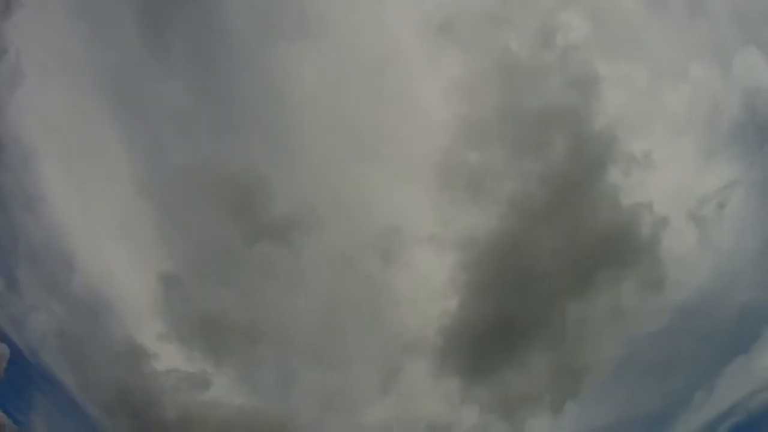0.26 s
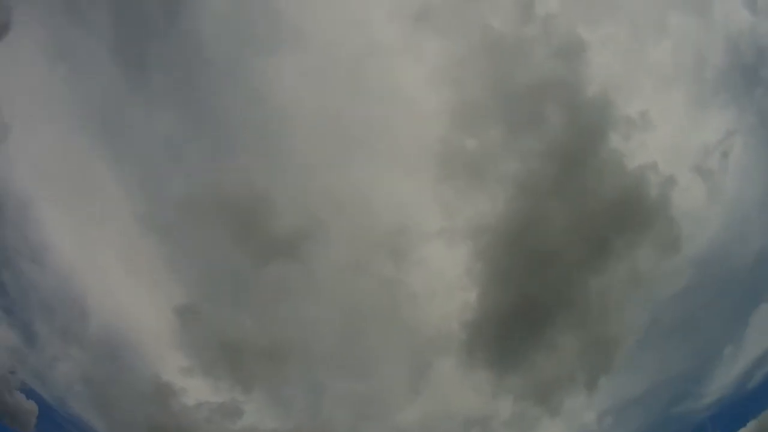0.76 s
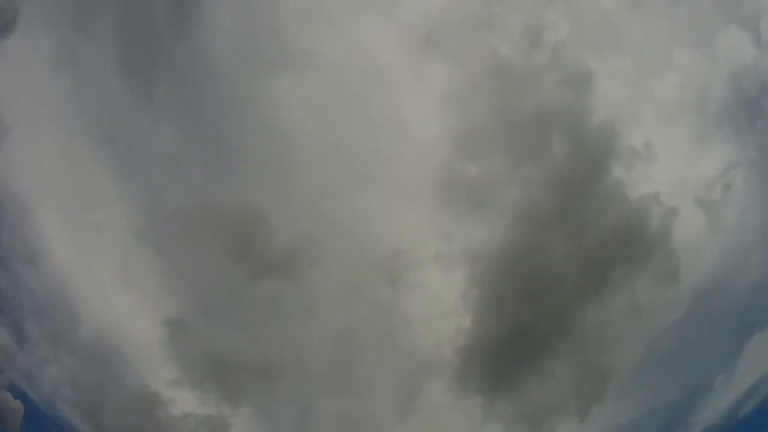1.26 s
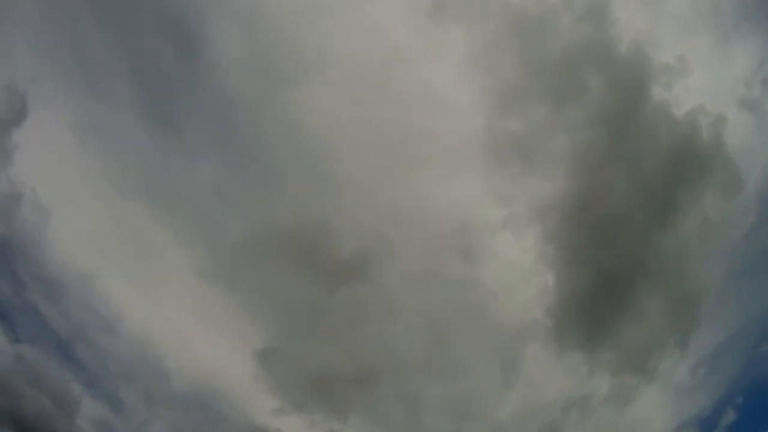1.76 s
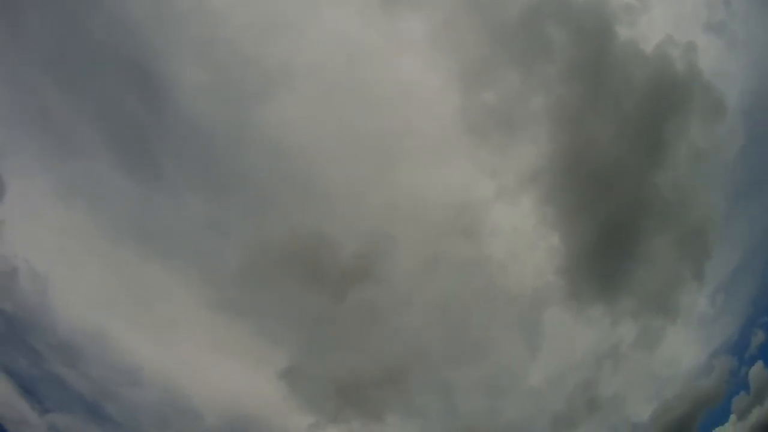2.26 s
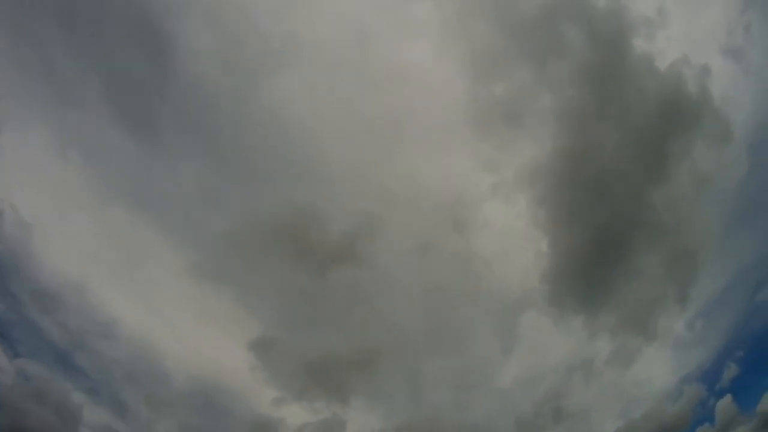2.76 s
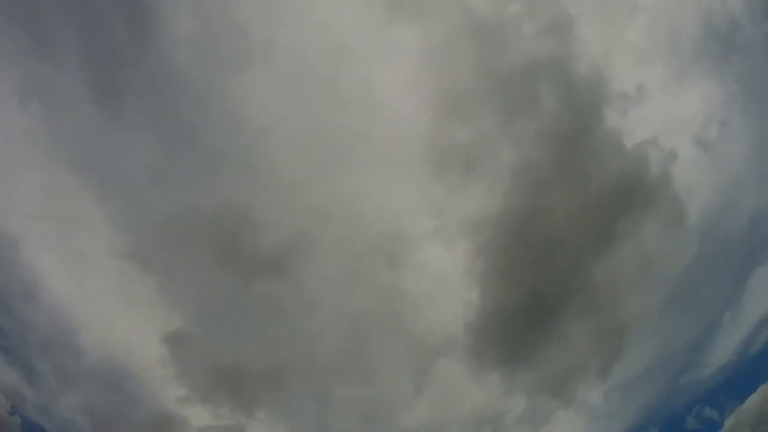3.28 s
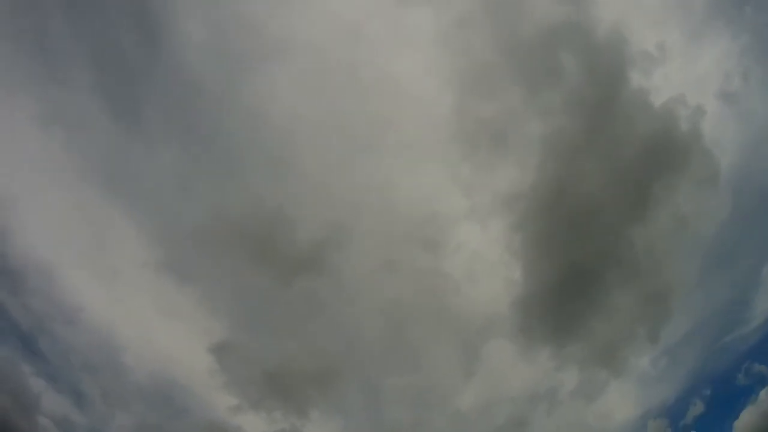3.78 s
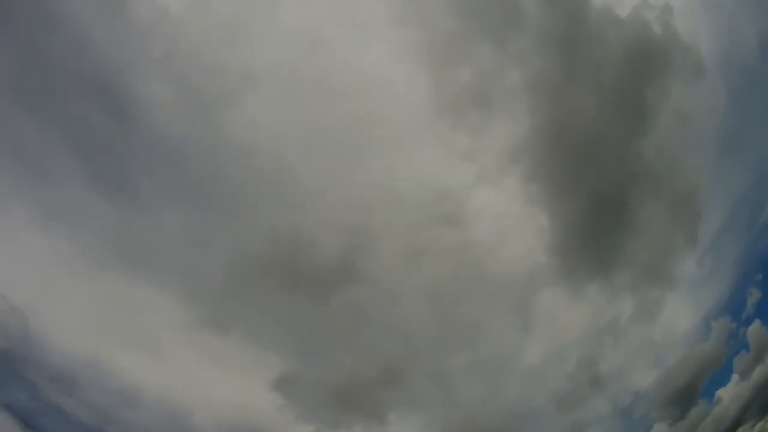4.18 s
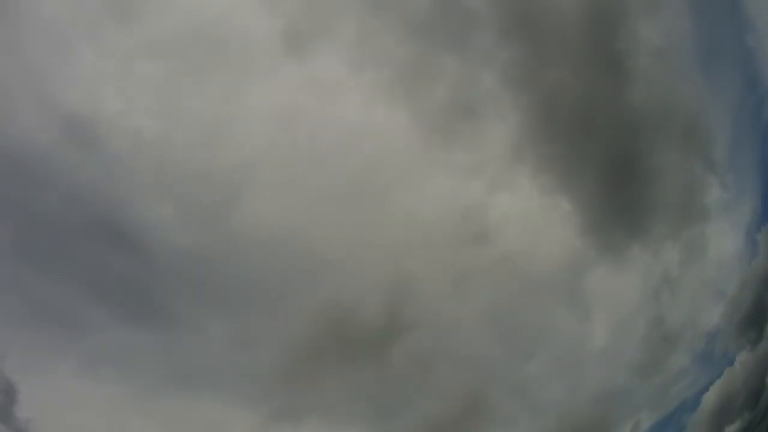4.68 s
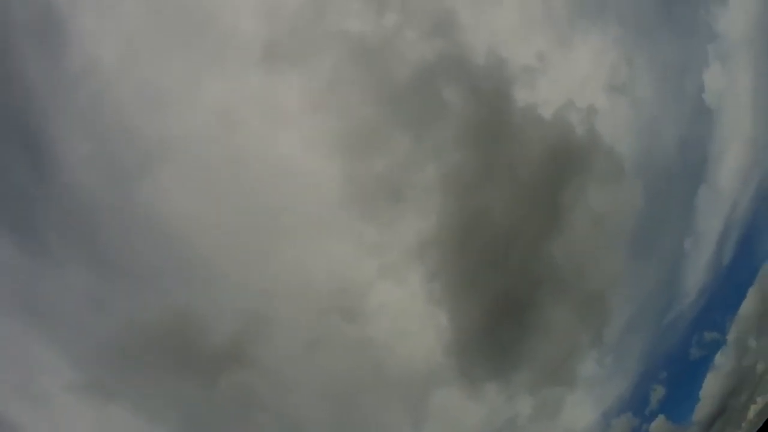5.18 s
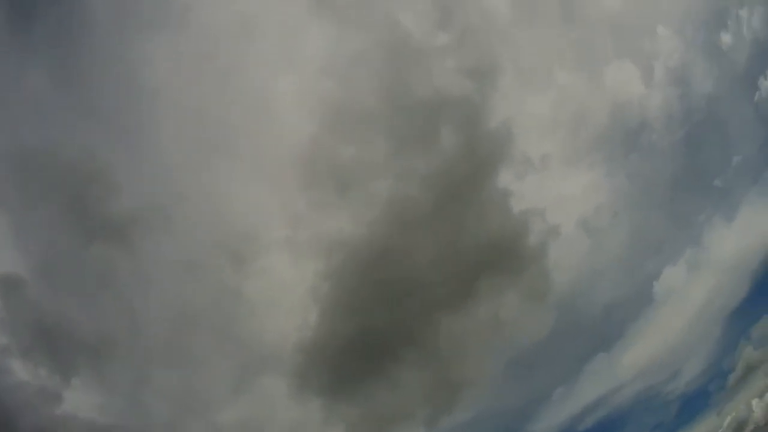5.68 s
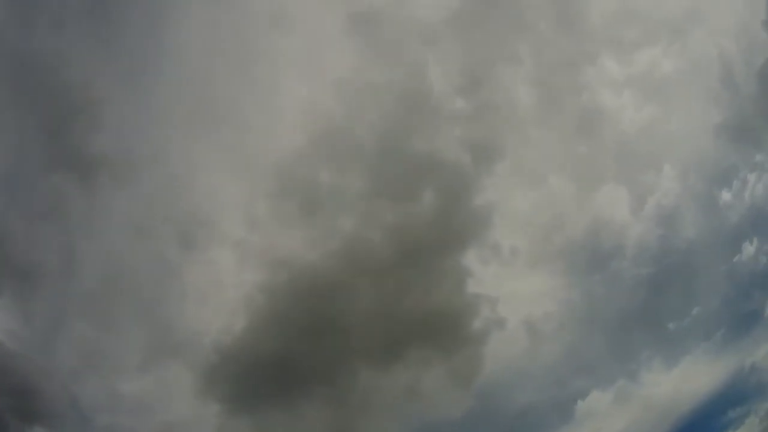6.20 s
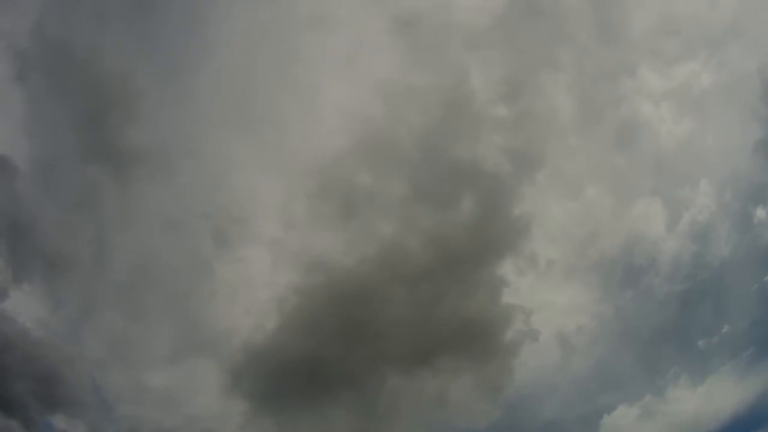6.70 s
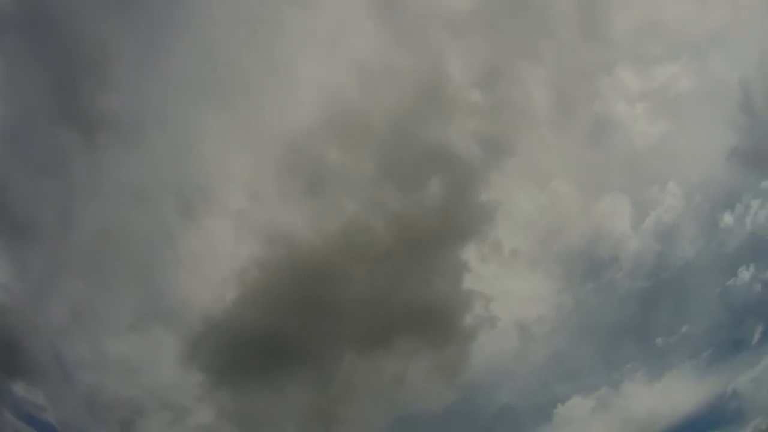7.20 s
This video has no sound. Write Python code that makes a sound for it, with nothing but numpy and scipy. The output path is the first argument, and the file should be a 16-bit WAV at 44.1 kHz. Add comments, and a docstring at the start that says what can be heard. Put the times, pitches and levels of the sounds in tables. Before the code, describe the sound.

Small electric drone whines at full throttle, pitch slowly sagging, then power cuts; gusty air rushes past amid knocks as the propellers stop, leaving faint ticking.

```python
"""A small electric aircraft in a full-throttle climb, heard by a microphone bolted to its frame.
Shaft orders whine through the frame's resonances over shaped-noise propeller wash while the battery sags
and the pitch sinks; faint rings tick steadily at the rate of the control signal. At 6.04 s the power is cut,
air rushes past as gusty noise, and the shaft runs down with knocks and a thin falling squeal.
It stops; the rush dies away over the ticks."""
import sys
import numpy as np
from scipy import signal
from scipy.fft import rfft, irfft, next_fast_len
from scipy.io import wavfile
from scipy.ndimage import uniform_filter1d

SR = 44100
rng = np.random.default_rng(int(sys.argv[2]) if len(sys.argv) > 2 else 0)


def voltage_ratio(decibels):
    """Convert decibels (scalar or array-like) to amplitude ratios, 20 dB per decade."""
    exponent = np.asarray(decibels, float) / 20
    return 10 ** exponent


def unload_wav(signal):
    """Save mono or channel-first audio to the path in sys.argv[1] as 16-bit WAV at rate SR, clipped to [-1, 1]."""
    wavfile.write(
        sys.argv[1],
        SR,
        np.round(np.clip(np.atleast_2d(signal).T, -1, 1) * 32767).astype(np.int16),
    )


N = 328545
TIME = np.arange(N) / SR
CUT_S = 6.042  # the power goes off

# The climb on a sagging battery: start_s [s], shaft_speed_hz [Hz], blade_turbulence_db [dB]
CLIMB = [(0, 368.6, -30.5), (.3, 366.6, -31.5), (.55, 365.2, -31), (.75, 363, -30), (.95, 359.8, -29.5),
         (1.2, 359, -30.5), (1.45, 359.2, -32), (1.8, 357.8, -34), (2.25, 357.8, -32.5), (2.7, 355.3, -34),
         (3.15, 353.5, -33), (3.6, 351.9, -34), (4.05, 349.6, -33.5), (4.5, 348, -35), (4.95, 346.6, -34),
         (5.4, 346.1, -37), (5.75, 345, -36.5), (6.03, 344.3, -34.5)]


def curves(rows):
    """Columns of a table joined by straight lines in time."""
    start_s, *columns = np.transpose(rows)
    return [np.interp(TIME, start_s, column) for column in columns]


def walk(rate_hz):
    """Random levels held for 1 / rate_hz seconds and slewed twice; spread near 1."""
    hold = int(SR / rate_hz)
    steps = np.repeat(rng.standard_normal(N // hold + 1), hold)
    return 1.3 * uniform_filter1d(uniform_filter1d(steps, hold), hold)[:N]


def bands(colour):
    """Overlapping slices of coloured noise, half an octave apart: pairs of centre in Hz and sound."""
    size = next_fast_len(N)
    octave = np.log2(np.arange(1, size // 2 + 2) * SR / size)
    hz, level_db = np.transpose(colour)
    tint = voltage_ratio(np.interp(octave, np.log2(hz), level_db, left=-95))
    spectrum = rfft(rng.standard_normal(size)) * tint
    for centre in np.arange(5, 14.6, .5):
        window = np.clip(1 - abs(octave - centre) / .5, 0, 1)
        yield 2 ** centre, irfft(spectrum * window, size)[:N]


def unit(x, part):
    """Scale a sound so that a part of it has rms 1."""
    return x / np.sqrt(np.mean(part ** 2))


def shaft():
    """Speed in Hz, sinking toward windmilling after the cut, and the share of load on the motor."""
    windmill_hz, sink_s, ease_s, unload_s = 147, .112, .025, .028
    after = np.maximum(TIME - CUT_S, 0)
    hz = windmill_hz + (curves(CLIMB)[0] - windmill_hz) * np.exp(-after / sink_s)
    return uniform_filter1d(hz, int(ease_s * SR)), np.clip(1 - after / unload_s, 0, 1)


def slowed(hz):
    """Octaves by which the shaft is below the climb's speed curve."""
    return np.log2(curves(CLIMB)[0] / hz)


def whine(turn, hz, load):
    """Shaft orders, phase-locked to the turn; the frame's peaks colour them, turbulence shakes them."""
    # Multiples of the shaft speed [count]
    orders = (1, 2, 3, 4, 5, 6, 7, 8, 9, 10, 11, 12, 14, 16, 18, 20, 22, 24, 28, 30)
    # Level of each order under power, before the frame colours it [rms dB]
    driven_levels = (-33.8, -27.6, -40, -49, -51, -33, -47.5, -34, -49, -46, -55, -50, -53, -52, -47, -51,
                      -52, -57, -53, -55)
    # Level of each order coasting, before frame and slowing [rms dB]
    coasting_levels = (-30, -28, -19, -39, -47, -30, -52, -28, -54, -42, -55, -34, -38, -52, -52, -54, -55,
                        -55, -58, -60)
    # Level each coasting order loses as the shaft slows [dB per octave of speed]
    coasting_fades = (1, 3, 30, 3, 0, 1, 0, 14, 0, -3, 0, 0, 5, -10, -10, -10, 0, 0, 0, 0)
    # Resonances of the frame, main ring first: centre_hz [Hz], width_hz [Hz], peak_db [dB]
    resonances = [(1066.4, 247, 26.5), (1379, 51, 10), (1802, 95, 13), (2171, 118, 11), (2893, 301, 8.5),
                  (3163, 136, 11), (3630, 280, 10.5), (4030, 68, 9.5), (4141, 158, 17.5), (4313, 63, 13.5),
                  (5150, 200, 9.5), (6236, 390, 6.5), (8330, 430, 11.5)]
    ring_hz, ring_lag_width_hz = resonances[0][0], 35
    coast_frame_share = .15  # unloaded blades hardly drive the frame's peaks
    out, down = np.zeros(N), slowed(hz)
    shake_db = 0.17 * walk(60) + 0.085 * walk(4.7)
    grid_hz = np.arange(0., 12000., 4.)
    frame_db = sum(peak_db / (1 + (2 * (grid_hz - centre_hz) / width_hz) ** 2)
                   for centre_hz, width_hz, peak_db in resonances)
    lag = .02 * walk(90)  # radians of shaft turn
    for k, driven_db, coasting_db, fade in zip(orders, driven_levels, coasting_levels, coasting_fades):
        # the strong orders waver less
        waver_db = 0.27 * walk(40) if k in (2, 3, 6, 8, 12) else 1.97 * walk(12)
        colour_db = np.interp(k * hz, grid_hz, frame_db)
        driven = load * voltage_ratio(driven_db + colour_db)
        coasting = (1 - load) * voltage_ratio(coasting_db + coast_frame_share * colour_db - fade * down)
        # an order that sweeps through the main ring shifts in phase by up to half a cycle
        behind = np.arctan2(ring_lag_width_hz / 2, ring_hz - k * hz)
        tone = np.sqrt(2) * np.cos(k * (turn + lag) - behind)
        out += (driven + coasting) * voltage_ratio(waver_db + shake_db) * tone
    return out


def smear(turn, load):
    """Unsteady blade load: bands of noise beside the odd orders that ride on the shaft speed."""
    # Smeared bands: shaft_multiple [ratio], level_db [rms dB]
    smeared = [(4.9, -46), (6.85, -39.5), (8.8, -42), (10.8, -39)]
    rate_hz = 300
    out = np.zeros(N)
    for multiple, level_db in smeared:
        band = walk(rate_hz) * np.cos(multiple * turn) + walk(rate_hz) * np.sin(multiple * turn)
        out += voltage_ratio(level_db) * band
    return load * out


def steady_tone(load):
    """A faint wavering whistle of fixed pitch under power, probably from the motor's power electronics."""
    # Whistle: pitch_hz [Hz], level_db [rms dB before it wavers]
    whistle = [(7612, -49)]
    return load * sum(voltage_ratio(level_db + 2.5 * walk(8)) * np.sqrt(2) * np.sin(2 * np.pi * pitch_hz * TIME)
                      for pitch_hz, level_db in whistle)


def wash(turn, octaves_down):
    """Roar of the slipstream, a narrow buzz, and hiss of the blade tips, which puffs twice a turn."""
    # Colour of the wash: centre_hz [Hz], density_db [dB per Hz, relative]
    wash_colour = [(40.0, -77), (80.0, -64.5), (150.0, -57), (300.0, -55), (500.0, -56), (850.0, -59.5),
                   (1300.0, -59), (1900.0, -65.5), (2500.0, -65), (3300.0, -65), (4000.0, -65.5),
                   (5200.0, -69.5), (7000.0, -68), (10000.0, -72), (13000.0, -74), (14400, -93),
                   (15100, -110)]
    # Layers tip hiss, low roar, topmost hiss, buzz (mixed 6.5 dB below its row): level_db [dB at mean
    # turbulence], swing_share [dB per dB], drift [dB per s], coasting_fall [dB per octave of speed]
    layer_laws = [(-36, 1.46, 0.5, 11), (-31.5, 0.69, 0.12, 1.5), (-39.5, 1.3, 0, 9), (-37.5, 1.5, 2.7, 18)]
    swing_db = curves(CLIMB)[1] - np.mean(np.transpose(CLIMB)[2])
    hiss_db, roar_db, edge_db, buzz_db = (
        level_db + share * swing_db + drift * (TIME - CUT_S / 2) - fall * octaves_down
        for level_db, share, drift, fall in layer_laws)
    roar, hiss, edge, low, high = np.zeros((5, N))
    gust = walk(30.18)
    for hz, band in bands(wash_colour):
        # roar crossfades into hiss from 400 Hz up to 11200 Hz
        share = np.clip(np.log2(hz / 400) / np.log2(11200 / 400), 0, 1)
        band = band * voltage_ratio(0.47 * walk(16) + 0.89 * share * gust)
        if hz > 11000:
            edge += band
            continue
        roar += (1 - share) * band
        hiss += share * band
        # reference parts that set the levels of roar and hiss
        low += band * (80 < hz < 320)
        high += band * (hz > 4600)
    # something loose buzzes in a narrow band, its level flickering many times a second
    buzz_filter = signal.butter(2, (9630, 10560), "band", fs=SR, output="sos")
    buzz = signal.sosfilt(buzz_filter, rng.standard_normal(N))
    buzz = buzz * voltage_ratio(3.9 * walk(55))
    tips = voltage_ratio(hiss_db) * unit(hiss, high) + voltage_ratio(edge_db) * unit(edge, edge)
    tips = tips + voltage_ratio(buzz_db - 6.5) * unit(buzz, buzz)
    # two puffs a turn, made uneven by one swell a turn
    puff = voltage_ratio(-2.2 * np.cos(2 * turn) + 1.3 * np.sin(turn))
    return voltage_ratio(roar_db) * unit(roar, low) + puff * tips


def ticks():
    """Control electronics: a short bell-shaped ring on every frame of the control signal."""
    rate_hz, one_tick_s = 49.9, 7.3874
    period_s = 1 / rate_hz
    first_s = one_tick_s - int(one_tick_s * rate_hz) / rate_hz
    t = (TIME - first_s + .5 * period_s) % period_s - .5 * period_s  # seconds from the nearest tick
    ring = np.sin(2 * np.pi * 2300 * t + 0.16 * walk(57))
    ring = ring + voltage_ratio(-24) * np.sin(2 * np.pi * 6500 * t)
    return voltage_ratio(-35) * np.exp(-.5 * (t / 0.00063) ** 2) * ring


def wind():
    """Eddies at the microphone port: rumble, rush and thin hiss surge together and flicker alone."""
    # Air over the port: start_s [s], strength_db [dB]
    air_strength = [(6.1, -38.5), (6.2, -24.5), (6.37, -18.5), (6.55, -16.5), (6.73, -19.5), (6.91, -21.5),
                    (7.18, -28.5), (7.45, -36.5)]
    # Colour of the air: centre_hz [Hz], density_db [dB per Hz, relative]
    air_colour = [(40, -73), (80, -58), (160, -47), (300, -49), (600, -57), (1200, -62), (1800, -70),
                  (2600, -81), (4000, -82.5), (5500, -94.5), (7000, -87.5), (9500, -101.7), (13000, -107.1)]
    # Layers rumble, rush, thin hiss: level_db [dB at -18 dB strength], slope [dB per dB of strength],
    # gust_share [ratio]
    layer_laws = [(-18.5, 1.0, -0.064), (-27.5, 0.88, 0.69), (-42.5, 1.2, 0.18)]
    # Gusts: centre_s [s], half_length_s [s], lift_db [dB before each layer's share]
    gusts = [(6.227, 0.09, 4), (6.36, 0.056, 1.5), (6.788, 0.11, 11), (7.005, 0.054, 5.5)]
    layers, surge = np.zeros((3, N)), walk(40)
    for hz, band in bands(air_colour):
        # rumble below 400 Hz, rush round 1 kHz, thin hiss from 4 kHz, crossfaded between
        place = np.interp(np.log2(hz), np.log2([400, 1000, 4000]), [0, 1, 2])
        shares = np.clip(1 - abs(place - np.arange(3)), 0, 1)
        layers += shares[:, None] * band * voltage_ratio(1.05 * surge + .9 * walk(25))
    rise = np.clip((TIME - 6.05) / 0.052, 0, 1)
    strength_db = curves(air_strength)[0] + 18
    gust_db = sum(lift_db * np.exp(-((TIME - centre_s) / half_s) ** 2)
                  for centre_s, half_s, lift_db in gusts)
    return rise * sum(voltage_ratio(level_db + slope * strength_db + share * gust_db) * unit(layer, layer)
                      for (level_db, slope, share), layer in zip(layer_laws, layers))


def burst(at_s, hz, width_s):
    """A few cycles under a bell: a short knock heard through the frame."""
    t = TIME - at_s
    return np.exp(-.5 * (t / width_s) ** 2) * np.sin(2 * np.pi * hz * t)


def knocking():
    """The shaft cogs to a halt: each knock rings at a main pitch, a lower and a higher one."""
    # Knocks: start_s [s, centre of the bell], level_db [dB, bell height of the main ring], ring_hz [Hz]
    knocks = [(6.159, -32, 8910), (6.207, -23, 7880), (6.241, -31, 5000), (6.257, -27, 5000),
              (6.270, -24, 5990), (6.277, -25, 5950), (6.392, -17, 4200)]
    out = np.zeros(N)
    for at_s, level_db, ring_hz in knocks:
        knock = burst(at_s, ring_hz, 0.00017)
        knock += 0.75 * burst(at_s, 0.53 * ring_hz, 0.00039)
        knock += 0.39 * burst(at_s, 1.9 * ring_hz, .0001)
        out += voltage_ratio(level_db) * knock
    return out


def squealing():
    """A thin, trembling squeal that swells and falls ever faster as the motor stops."""
    start_s, end_s = 6.225, 6.375
    start_hz, end_hz, bend = 13050, 11450, 1.6
    end_db, swell_db = -52, 14
    gone = np.clip((TIME - start_s) / (end_s - start_s), 0, 1)
    hz = start_hz + (end_hz - start_hz) * gone ** bend + 70 * walk(200)
    level_db = end_db - swell_db * (1 - gone) ** 3.3 + 2.9 * walk(120)
    squeal = voltage_ratio(level_db) * np.sqrt(2) * np.sin(2 * np.pi * np.cumsum(hz) / SR)
    return squeal * ((gone > 0) & (gone < 1))


def scene():
    """Everything reaches one microphone bolted to the frame."""
    halt_s, halt_fade_s = 6.28, .04
    hz, load = shaft()
    turn = 2 * np.pi * np.cumsum(hz) / SR
    turning = np.clip((halt_s - TIME) / halt_fade_s, 0, 1)
    propeller = whine(turn, hz, load) + smear(turn, load) + steady_tone(load) + wash(turn, slowed(hz))
    mix = turning * propeller + ticks() + wind() + knocking() + squealing()
    return mix[None]


def low_pass(x):
    """Removes everything above the highest recorded frequency."""
    return signal.sosfilt(signal.butter(12, 15040, fs=SR, output="sos"), x)


def record(dry):
    """The microphone stage hisses faintly, rounds the peaks and sits slightly off zero."""
    hissing = dry + voltage_ratio(-66) * rng.standard_normal(dry.shape)
    rounded = np.tanh(1.052 * hissing) / 1.105
    return low_pass(rounded - .0054)


dry = scene()
out = record(dry)
unload_wav(out)
```